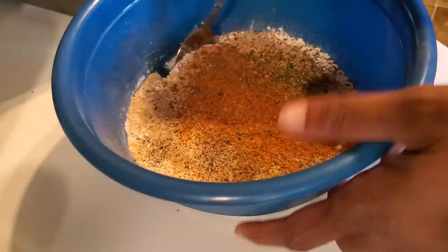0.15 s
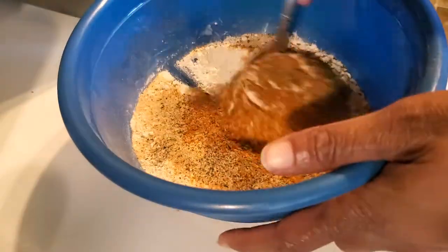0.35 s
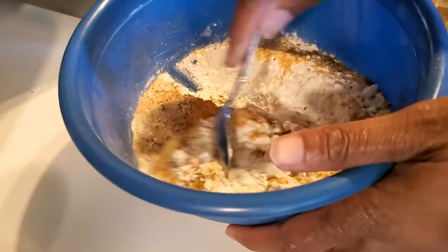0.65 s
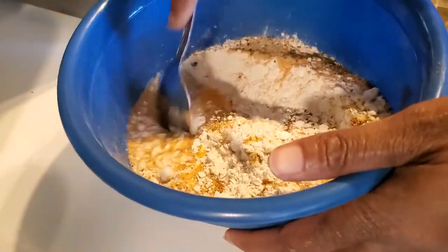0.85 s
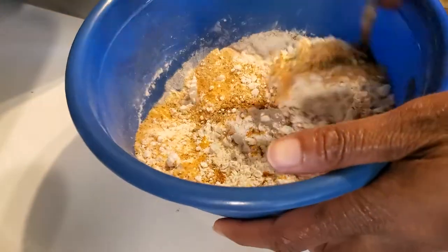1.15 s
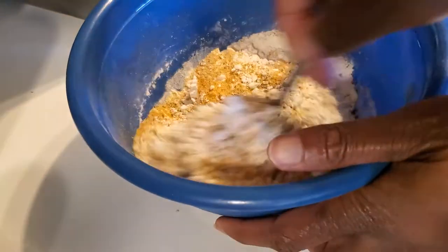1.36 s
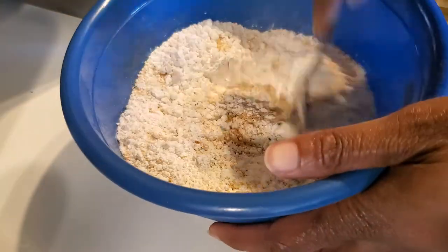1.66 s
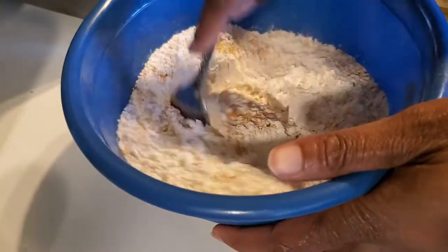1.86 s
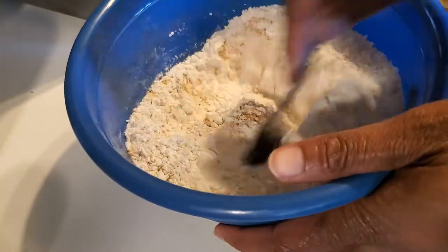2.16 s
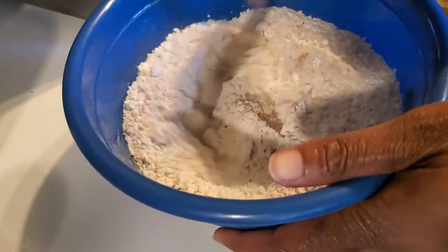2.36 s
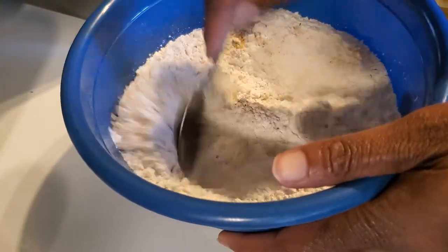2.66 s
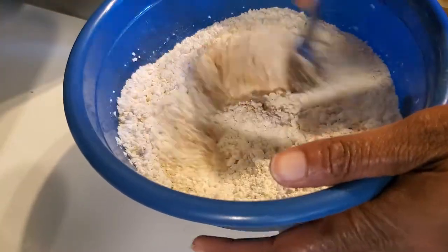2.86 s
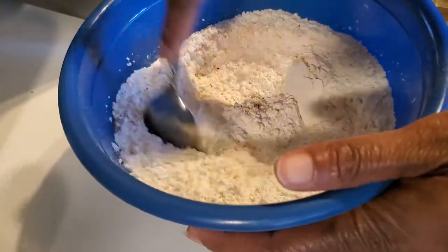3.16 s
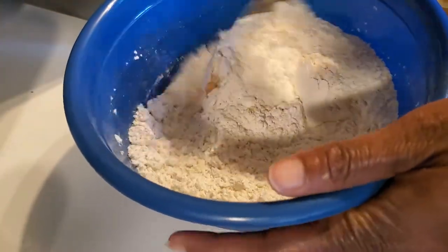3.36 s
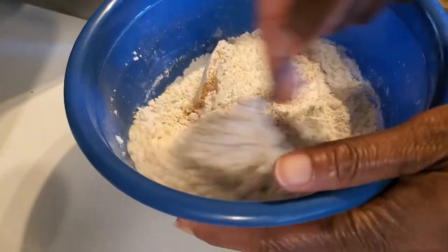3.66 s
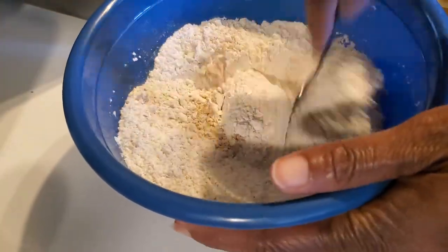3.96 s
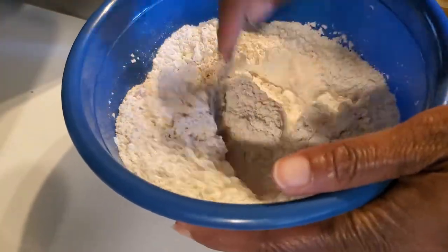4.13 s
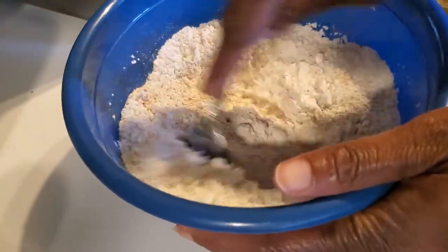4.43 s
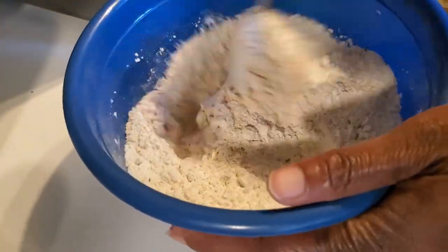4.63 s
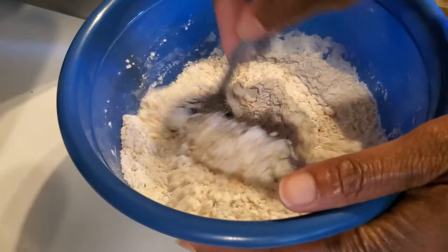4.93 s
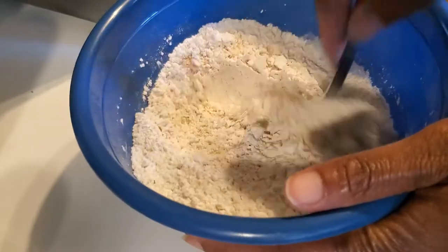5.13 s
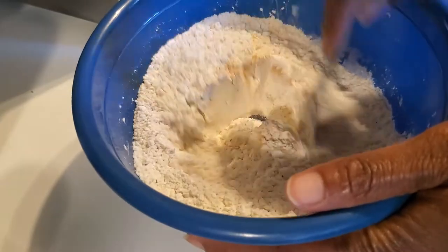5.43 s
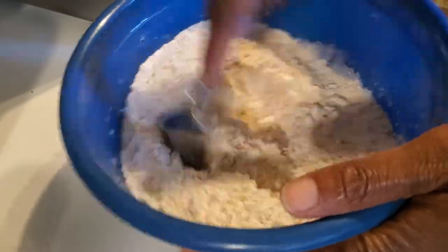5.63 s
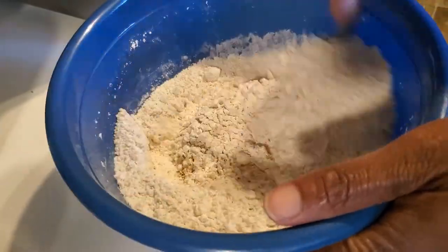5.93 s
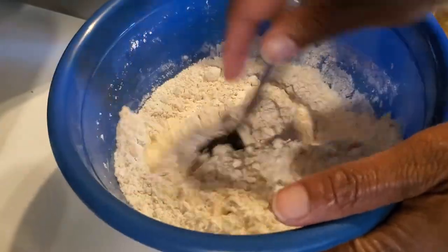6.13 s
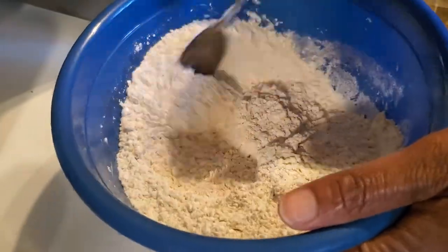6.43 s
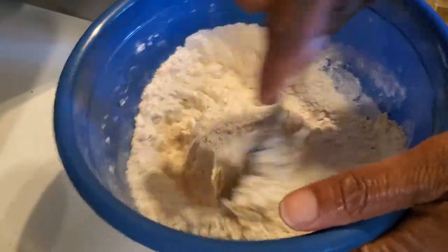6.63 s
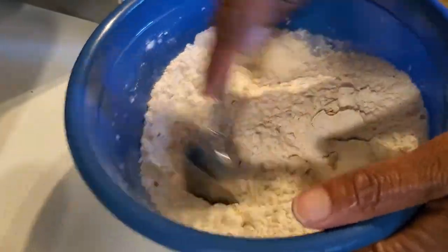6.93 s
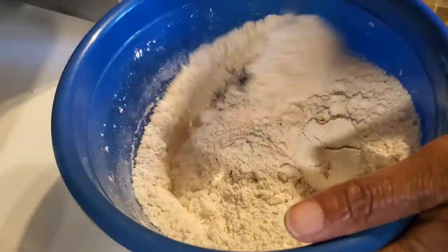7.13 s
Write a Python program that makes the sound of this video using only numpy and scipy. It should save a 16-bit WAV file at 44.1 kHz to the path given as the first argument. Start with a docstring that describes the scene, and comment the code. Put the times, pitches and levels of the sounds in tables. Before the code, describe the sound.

Close up and a little to the left, dry flour rustles as a metal spoon sweeps around a plastic bowl in quick, uneven strokes. The spoon drags along the wall and keeps tapping it, giving dull thumps, short clicks and a couple of louder clacks. The stirring carries on throughout, while kitchen appliance motors hum steadily over a low room rumble.

```python
"""Stirring flour in a plastic bowl

Close up at a kitchen counter, a little left of a stereo microphone pair, a steel spoon stirs dry flour.
It knocks and drags on the bowl, ringing the base, wall and rim; the flour hisses and crackles as it
slides. The knocks echo briefly in the kitchen, and two appliance motors hum over a low room rumble."""
import sys
import numpy as np
from scipy import signal
from scipy.fft import rfft, irfft, next_fast_len
from scipy.io import wavfile

SR = 44100
rng = np.random.default_rng(int(sys.argv[2]) if len(sys.argv) > 2 else 0)


def materialize(psi):
    """Save the field psi as 16-bit PCM at rate SR to the path in sys.argv[1].

    A 1-D psi becomes a single channel; in a 2-D psi each row is a channel.
    """
    bounded = np.clip(np.atleast_2d(psi).T, -1, 1)
    quanta = np.round(bounded * 32767).astype(np.int16)
    wavfile.write(sys.argv[1], SR, quanta)


N = 321469

# blows of the spoon on the bowl: start_s, clack_db, clack_centre_hz, knock_db, thump_db, thump_centre_hz
BLOWS = [(0.0342, -26.5, 3460, -24.5, -31.5, 227), (0.0952, -32.5, 2380, -32.5, -59, 264),
         (0.132, -21, 1350, -49, -44, 218), (0.3036, -37, 1290, -65, -63, 261),
         (0.75, -61, 2550, -57, -41, 216), (0.841, -37.5, 1190, -33.5, -32, 242),
         (0.923, -21.5, 2170, -31, -47, 460), (0.9418, -23, 1230, -29.5, -35, 267),
         (1.012, -45, 1800, -38, -45, 260), (1.143, -49, 2180, -47.5, -57, 258),
         (1.2663, -39, 2140, -69, -64, 196), (1.4248, -42.5, 1340, -55, -27, 260),
         (1.5419, -32, 1390, -31, -18.5, 276), (1.574, -61, 1400, -42, -34, 270),
         (1.6492, -35.5, 1200, -44, -75, 268), (1.732, -8.5, 2540, -17.5, -16, 432),
         (1.7546, -42, 3350, -60, -25, 272), (1.873, -36, 2500, -50, -49, 221),
         (1.908, -34, 2360, -51, -39.5, 260), (1.9446, -32.5, 2344, -46, -45, 266.6),
         (2.1224, -35, 1220, -53, -58, 275), (2.2065, -31.5, 2620, -35.5, -20, 336),
         (2.312, -38.5, 2040, -39.5, -41, 231), (2.4212, -35, 1400, -59, -63, 260),
         (2.469, -32.5, 1920, -37, -59, 261), (2.5406, -48, 2110, -44, -35.5, 216),
         (2.591, -26.5, 1560, -31.5, -27.5, 415), (2.7115, -34, 1440, -30.5, -24, 340),
         (3.095, -32, 1580, -41, -37.5, 350), (3.2819, -26.5, 2570, -38.5, -41, 493),
         (3.2947, -31.5, 3930, -48, -60, 264), (3.3337, -32.5, 4200, -50, -63, 291),
         (3.3443, -35, 4400, -47, -60, 304), (3.3829, -26, 4340, -41, -62, 307),
         (3.4128, -24, 2470, -31, -38, 171), (3.4572, -40, 4000, -37, -40, 293),
         (3.477, -36, 2510, -55, -54, 260), (3.5157, -27.5, 2150, -35, -34.5, 380),
         (3.696, -37.5, 1670, -49, -36, 271), (3.7323, -44, 1260, -41.5, -34, 261),
         (3.8907, -33.5, 2120, -51, -24, 176), (3.9549, -32, 1280, -54, -54, 258),
         (4.0511, -24, 1760, -42, -29, 296), (4.1017, -33, 1230, -30.5, -19.5, 325),
         (4.3409, -28.5, 2160, -33, -15, 476), (4.4166, -31, 3580, -34.5, -30, 423),
         (4.4387, -31.5, 1960, -38, -42, 264), (4.5683, -60, 2200, -52, -57, 172),
         (4.5948, -37, 2340, -46, -59, 215), (4.645, -32, 2400, -46, -60, 186),
         (4.6547, -34.5, 3280, -33.5, -31, 227), (4.7929, -32.5, 2260, -46, -42, 153),
         (4.928, -38, 1490, -46, -37, 290), (4.9508, -28, 2100, -31, -30, 300),
         (5.073, -30.5, 1310, -18, -20.5, 198), (5.1027, -56, 1240, -32, -36, 258),
         (5.145, -31.5, 1160, -32.5, -38, 151), (5.2898, -71, 2160, -40.5, -41.5, 236),
         (5.5005, -12, 2430, -22, -29, 330), (5.5731, -17, 1490, -21.5, -20, 503),
         (5.6016, -34, 1350, -32, -26, 306), (5.788, -33, 4440, -38.5, -37, 257),
         (5.8103, -28, 2600, -26.5, -24.5, 255), (5.912, -42, 2630, -42.5, -56, 288),
         (5.9586, -32, 2100, -50, -42, 291), (5.9922, -29, 1280, -41, -30.5, 269),
         (6.02, -41, 2200, -50, -50, 270), (6.113, -38, 1400, -47, -46, 263),
         (6.4557, -29.5, 1330, -29.5, -31, 333), (6.487, -23, 2030, -31.5, -35, 310),
         (6.6447, -43, 2920, -57, -52, 215), (6.7685, -22.5, 2000, -30, -29, 403),
         (6.8563, -31, 1320, -33.5, -28, 413), (6.8915, -35, 2500, -60, -62, 207),
         (6.9076, -38, 3730, -39, -21.5, 278), (6.937, -28.5, 2430, -29.5, -26, 298),
         (6.994, -40, 2130, -30.5, -58, 266), (7.0411, -22.5, 2200, -43, -38.5, 269),
         (7.1357, -39, 3350, -48, -39, 157), (7.2013, -33.5, 2130, -50, -35, 163)]
# modes of the plastic bowl and the steel spoon: pitch_hz, level_db, t60_s
BASE_MODES = [(113, 3.5, 0.092), (151, -3, 0.041), (179.4, -13, 0.024), (232, -17.5, 0.045),
              (262.6, -5.5, 0.13), (299, 5, 0.056), (361, -3.5, 0.054), (425, -5, 0.068), (502, 3.5, 0.022)]
WALL_MODES = [(498, -7, 0.011), (587.7, -9, 0.13), (700, 1.5, 0.051), (835, -11, 0.042), (843.4, -8, 0.069),
              (976, 5, 0.018), (1146, -0.5, 0.021)]
RIM_MODES = [(1400, 7.5, 0.0082), (1594, 10.9, 0.0019), (2207, 4.7, 0.011), (2690, 1.5, 0.012),
             (3000, 0.46, 0.01), (3344, 1, 0.0068), (3640, 3.17, 0.009)]
SPOON_MODES = [(4870, -9.5, 0.017), (5330, -6.5, 0.037), (6290, -2.5, .018), (8620, -4.5, 0.024)]

SPOON_LEFT_DB = 4.5   # left microphone over right
BASS_PAN = np.array([[1.06], [.94]])   # left and right gain: low sounds sit near the middle


def knocks():
    """Each blow lands and bounces within 4 ms: the base thumps, the wall knocks, the rim clacks."""
    # bright noise of the steel edge biting: frequency_hz, density_db
    bite_spectrum = [(2470, -33), (4200, -1.5), (5810, -11), (6430, 2), (7230, -10), (8650, -32.5),
                     (10400, -12), (14400, -28), (16000, -30)]
    start_s, clack_db, clack_hz, knock_db, thump_db, thump_hz = np.transpose(BLOWS)
    late_s = rng.random((len(BLOWS), 4)) * 0.003927 * (np.arange(4) > 0)   # one contact, three bounces
    at = ((start_s[:, None] + late_s) * SR).astype(int)
    weight = from_db(-1500 * late_s) * rng.choice([-1, 1], late_s.shape)
    thump = struck(BASE_MODES, thump_db, thump_hz, at[:, :1], weight[:, :1], uneven_db=7.5, narrow_db=33)
    cushion = signal.butter(2, [125, 900], "band", fs=SR, output="sos")   # flour softens the thump
    thump = signal.sosfilt(cushion, thump)
    knock_hz = np.full(len(BLOWS), 648)   # every wall knock rings around the same middle pitch
    knock = struck(WALL_MODES, knock_db, knock_hz, at[:, :2], weight[:, :2], uneven_db=6, narrow_db=20)
    clack = struck(RIM_MODES, clack_db, clack_hz, at, weight, uneven_db=1.5, narrow_db=12.5)
    # the edge bites more on higher and harder clacks
    bite_db = clack_db - 15.5 + 11.5 * np.log2(clack_hz / 2000) + 0.074 * (clack_db + 30)
    contacts = np.zeros(N)
    np.add.at(contacts, at, abs(weight) * from_db(bite_db)[:, None])
    bright_noise = banded(rng.standard_normal((2, 2, N)), bite_spectrum, patchy_db=.7)
    bite = decay(contacts, t60_s=0.0064) * bright_noise
    return thump * BASS_PAN + (knock + clack + bite) * pan(SPOON_LEFT_DB)


def stirring():
    """Flour hisses and rasps on the steel; the edge drags, cracks lumps and shakes the bowl."""
    # sliding flour: frequency_hz, density_db
    hiss_spectrum = [(1760, -41), (3000, 5.5), (5750, -8), (6670, -19), (7510, -3), (8760, -11),
                     (11500, -5), (16000, -3)]
    flow, push, drag_hz = strokes()
    fine = grains(per_s=330, uneven_db=14.5, share=0.14)
    coarse = grains(per_s=90, uneven_db=4.5, share=0.5)
    skid, skid_hz = skids()
    hiss = np.hypot(flow, from_db(-20) * skid) * banded(fine, hiss_spectrum, patchy_db=1.2)
    steel = np.hypot(from_db(-8.5) * flow, from_db(-16.5) * skid) * spoon_rasp(coarse[1])
    drag_hz = drag_hz * (skid_hz / drag_hz) ** (skid / (skid + push))   # a strong skid sets the spot
    push = np.hypot(push, skid)
    drag = push * wall_drag(coarse, drag_hz) + crunch(push, drag_hz)
    return (hiss + steel + drag) * pan(SPOON_LEFT_DB) + bowl_rumble(coarse[0], push) * BASS_PAN


def strokes(attack_s=.018, release_db_per_s=169):
    """Each stroke swells, holds and fades; returns hiss gain, drag gain and the rubbed spot's pitch."""
    # sweeps of the spoon: start_s, length_s, hiss_db, drag_db, drag_centre_hz
    sweeps = [(0.029, 0.068, -43, -50, 950), (0.17, 0.1, -90, -61.5, 1900), (0.42, 0.071, -69, -69.5, 3140),
              (0.71, 0.41, -65.5, -68.5, 2170), (0.897, 0.027, -67, -53, 1900),
              (0.988, 0.022, -76, -51, 1760), (1.066, 0.066, -78, -59, 1400),
              (1.126, 0.069, -59, -56, 2000), (1.214, 0.13, -57, -61, 2700),
              (1.397, .26, -63.5, -67.5, 1740), (1.732, 0.075, -63.5, -45, 3150),
              (1.888, 0.15, -59, -62, 2400), (2.191, 0.27, -63.5, -60, 1670), (2.55, 0.069, -60, -56, 1780),
              (2.71, 0.063, -72, -67, 1850), (2.894, 0.32, -65.5, -62.5, 2250),
              (3.22, 0.19, -55, -67, 3400), (3.336, 0.064, -46, -49.5, 4600), (3.417, 0.12, -54, -49, 2550),
              (3.575, 0.19, -60.5, -61, 2150), (3.902, 0.035, -64, -57, 1560),
              (4.065, 0.11, -67, -63.5, 1750), (4.331, .14, -55, -59, 2720), (4.526, 0.3, -57.5, -56, 2340),
              (4.851, 0.13, -74, -56, 2000), (5.075, 0.13, -65, -79, 1500),
              (5.278, 0.12, -68.5, -63.5, 1550), (5.489, 0.19, -56, -59, 2880),
              (5.74, 0.38, -56, -58.5, 2480), (6.446, 0.15, -64, -56, 1770), (6.626, 0.03, -52, -55, 2510),
              (6.816, 0.19, -58, -51.5, 2340), (7.022, 0.19, -59.5, -57.5, 2390)]
    t = np.arange(N) / SR
    hiss, drag = np.full(N, from_db(-77)), np.full(N, from_db(-84))   # flour settling between strokes
    weighted_pitch = drag * np.log(2000)
    for start, length, hiss_db, drag_db, hz in sweeps:
        shape = np.clip((t - start) / attack_s, 0, 1)
        shape *= from_db(-release_db_per_s * np.maximum(t - start - length, 0))
        hiss += from_db(hiss_db) * shape
        drag += from_db(drag_db) * shape
        weighted_pitch += from_db(drag_db) * shape * np.log(hz)
    return hiss, drag, np.exp(weighted_pitch / drag)


def skids(below_clack_db=20.5):
    """The spoon scrapes on after each blow; returns the scrape's envelope and centre pitch."""
    start_s, clack_db, clack_hz = np.transpose(BLOWS)[:3]
    at = (start_s * SR).astype(int)
    onsets = np.zeros(N)
    onsets[at] = from_db(clack_db - below_clack_db)
    latest_blow = np.clip(np.searchsorted(at, np.arange(N), "right") - 1, 0, None)
    return decay(onsets, t60_s=0.13), clack_hz[latest_blow]


def wall_drag(grit, centre_hz, narrow_db=10.5, patchy_db=4.0):
    """The dragging edge keeps wall, rim and spoon modes sounding, most near the rubbed spot's pitch."""
    slips = np.diff(grit, prepend=0)   # sudden slips, with little low push
    out, power = 0, 0
    for k, (hz, db, t60) in enumerate(WALL_MODES[4::2] + RIM_MODES + SPOON_MODES[:2]):
        gain = from_db(db - narrow_db * np.log2(hz / centre_hz) ** 2)
        tone = unit_rms(ring(slips[k % 2], hz, .7 * t60))   # the pressing spoon damps the ring
        out = out + gain * from_db(patchy_db * drift(9.4)) * mic_pair(*tone, hz)
        power = power + gain ** 2
    return out / np.sqrt(power)


def crunch(push, centre_hz, lumps_per_s=45, above_drag_db=6.5):
    """Lumps crack at random under the edge and tick in the rim and spoon, louder as the drag grows."""
    at = np.flatnonzero(rng.random(N - 200) < lumps_per_s / SR)
    extra_db = 3.5 * np.minimum(rng.exponential(1, N)[at], 3)
    level_db = 20 * np.log10(push[at]) + above_drag_db + extra_db
    return struck(RIM_MODES + SPOON_MODES, level_db, centre_hz[at], at[:, None], np.ones((len(at), 1)),
                  uneven_db=2.5, narrow_db=1.5)


def spoon_rasp(grit, patchy_db=3.0):
    """Grains rubbing past keep the spoon's modes sounding by turns; rms 1."""
    slips = np.diff(grit, prepend=0)
    return unit_rms(sum(from_db(db + patchy_db * drift(12.5)) * unit_rms(ring(slips, hz, t60))
                        for hz, db, t60 in SPOON_MODES))


def bowl_rumble(grit, push):
    """The drag shakes the low modes of base and wall, which swell less steeply than the drag itself."""
    modes = BASE_MODES[2::2] + WALL_MODES[::2]
    shake = sum(from_db(db) * mic_pair(*ring(grit, hz, .5 * t60), hz) for hz, db, t60 in modes)
    return from_db(-54) * (push / from_db(-55)) ** 0.68 * unit_rms(shake)


def grains(per_s, uneven_db, share):
    """Two mid and side pairs of noise carrying the same crackle of uneven grains, which come in clumps."""
    born = rng.random(N) < per_s * from_db(7 * drift(12)) / SR
    size = from_db(uneven_db * np.minimum(rng.exponential(1, N), 5)) * born
    bursts = unit_rms(signal.lfilter([1], [1, -.97], size))   # each dies within a millisecond or two
    return rng.standard_normal((2, 2, N)) * (1 + share * bursts)


def struck(modes, level_db, centre_hz, at, weight, uneven_db, narrow_db):
    """Each hit rings the modes with new strengths, favouring those near the struck spot's pitch."""
    mode_hz, mode_db, _ = np.transpose(modes)
    strength_db = mode_db + uneven_db * rng.standard_normal((len(at), len(modes)))
    strength = from_db(strength_db - narrow_db * np.log2(mode_hz / centre_hz[:, None]) ** 2)
    strength *= (from_db(level_db) / np.linalg.norm(strength, axis=1))[:, None]
    out = np.zeros((2, N))
    for size, (hz, _, t60) in zip(strength.T, modes):
        mid, side = np.zeros((2, N))
        sign = rng.choice([-1, 1], (len(at), 2))
        if hz > 500:   # short waves have nodes all over the wall, so signs vary from spot to spot
            size = size * sign[:, 0]
        np.add.at(mid, at, weight * size[:, None])
        # a quarter cycle later, so the channels part in phase and not in level
        np.add.at(side, at + round(SR / hz / 4), weight * size[:, None] * sign[:, 1:])
        out += ring(mic_pair(mid, side, hz), hz, t60)
    return out


def kitchen_echo(x, t60_s=0.3, wall_cut_hz=14000):
    """Sound returns from the kitchen walls along sixteen feedback delays, duller on every round."""
    size = next_fast_len(N + SR)
    hz = np.arange(1, size // 2 + 2) * SR / size
    dull = 1 / (1 + 1j * hz / wall_cut_hz)
    echoes = np.zeros((2, len(hz)), complex)
    for k, lag_s in enumerate(rng.uniform(.006, .035, 16)):
        loop = from_db(-60 * lag_s / t60_s) * dull * np.exp(-2j * np.pi * hz * lag_s)
        echoes[k % 2] += loop / (1 - loop) * (-1) ** (k // 2)
    return irfft(rfft(x.mean(axis=0), size) * mic_pair(*echoes, hz), size)[:, :N]


def motors():
    """Two appliance motors hum at multiples of their slightly wavering turning rates, with thin whines."""
    # hum of each motor: multiple, rms_db
    slow_orders = [(1, -91), (2, -56), (3, -63), (4, -61), (5, -62.5), (6, -66.5), (8, -88), (10, -74.5)]
    fast_orders = [(1, -52.5), (3, -62), (4, -69.5)]
    # flickering high tones: pitch_hz, rms_db
    whines = [(3850, -89.5), (5140, -99.5), (6255, -84), (7203, -81.5), (9300, -84)]
    t, hum = np.arange(N) / SR, 0
    for rate_hz, orders in (53.1, slow_orders), (59.4, fast_orders):
        turn = 2 * np.pi * rate_hz * t + 0.11 * drift(6.4)
        for multiple, db in orders:
            gain = from_db(db + 0.22 * drift(4.2))
            hum = hum + gain * np.sin(multiple * turn + 2 * np.pi * rng.random())
    whine = sum(from_db(db + 1.8 * drift(6.6)) * np.sin(2 * np.pi * hz * t) for hz, db in whines)
    return np.sqrt(2) * (hum + whine) * BASS_PAN


def room_tone():
    """The kitchen's low rumble, with a faint hiss above it."""
    # background noise: frequency_hz, density_db
    spectrum = [(18, -27), (30, -8), (79, -11.5), (215, -14), (280, -11.5), (415, -26), (554, -20.5),
                (988, -67.5), (4530, -66), (5040, -30), (5740, -63.5), (6210, -33), (7470, -40),
                (8520, -34), (16000, -45)]
    return from_db(-56) * banded(rng.standard_normal((2, 2, N)), spectrum, patchy_db=1.8) * BASS_PAN


def banded(noise, spectrum, patchy_db):
    """Stereo noise in half-octave bands, each with its own level and flicker; rms 1."""
    out, shared_flicker = 0, drift(5.6)
    bottom_hz, top_hz = spectrum[0][0], spectrum[-1][0]
    edges = np.geomspace(bottom_hz, top_hz, round(2 * np.log2(top_hz / bottom_hz)) + 2)
    for k, (low, high) in enumerate(zip(edges, edges[1:])):
        band = signal.butter(2, [low, high], "band", fs=SR, output="sos")
        mid, side = signal.sosfilt(band, noise[k % 2])
        hz = np.sqrt(low * high)
        flicker_db = patchy_db * (shared_flicker + 2.4 * drift(11.0))
        out = out + from_db(db_at(spectrum, hz) + flicker_db) * mic_pair(mid, side, hz)
    return unit_rms(out)


def mic_pair(mid, side, hz):
    """Left and right from mid and side; long waves reach both microphones alike."""
    # stereo width of the pair: frequency_hz, side_over_mid_db
    width = [(60, -21), (120, -22), (240, -19), (480, -5), (950, -8), (1890, -3), (3770, 0), (7520, 0),
             (15000, 0)]
    share = from_db(db_at(width, hz))
    return (mid + share * side * [[1], [-1]]) / np.sqrt(1 + share ** 2)


def ring(x, hz, t60_s):
    """One mode: a unit click sets a sine of height 1 ringing."""
    r, w = from_db(-60 / (t60_s * SR)), 2 * np.pi * hz / SR
    return signal.lfilter([0, np.sin(w)], [1, -2 * r * np.cos(w), r * r], x + 1e-18)


def decay(clicks, t60_s):
    """Give each click an exponential tail."""
    return signal.lfilter([1], [1, -from_db(-60 / (t60_s * SR))], clicks + 1e-18)


def drift(rate_hz):
    """Slow random wander of rms 1."""
    step = 40   # samples between points
    r = np.exp(-2 * np.pi * rate_hz * step / SR)
    slow = signal.lfilter([1], [1, -2 * r, r * r], rng.standard_normal(N // step + 2002))[2000:]
    return np.interp(np.arange(N) / step, np.arange(len(slow)), unit_rms(slow))


def db_at(spectrum, hz):
    """Read a level on a log-frequency axis."""
    points_hz, points_db = np.transpose(spectrum)
    return np.interp(np.log(hz), np.log(points_hz), points_db)


def pan(left_db):
    """Left and right gains for a level difference."""
    return from_db([[left_db / 2], [-left_db / 2]])


def from_db(db):
    """Decibels to gain."""
    return 10 ** (np.asarray(db) / 20)


def unit_rms(x):
    """Scale to rms 1."""
    return x / np.sqrt(np.mean(x ** 2) + 1e-20)


def scene():
    """The bowl up close, with the kitchen's echo, motors and room tone behind it."""
    blows, room = knocks(), room_tone()
    return blows + from_db(-15.5) * kitchen_echo(blows) + stirring() + motors() + room


def record(dry, bass_cut_hz=57, ceiling=.8, top_cut_hz=16500):
    """The microphones drop the deep bass, the hardest peaks are rounded and the top is cut steeply."""
    thinned = signal.sosfilt(signal.butter(2, bass_cut_hz, "high", fs=SR, output="sos"), dry)
    rounded = ceiling * np.tanh(thinned / ceiling)
    return signal.sosfilt(signal.cheby2(14, 70, top_cut_hz, fs=SR, output="sos"), rounded)


dry = scene()
out = record(dry)
materialize(out)
```